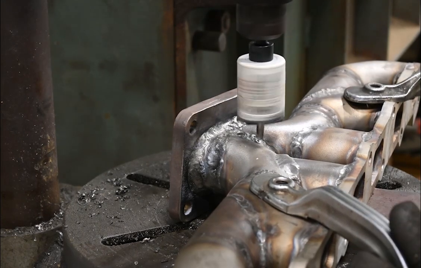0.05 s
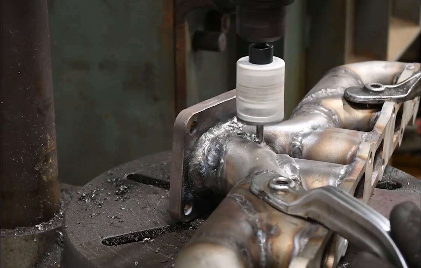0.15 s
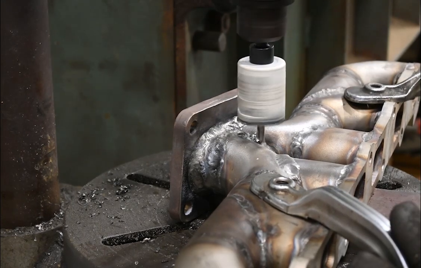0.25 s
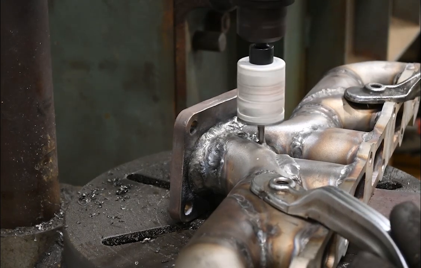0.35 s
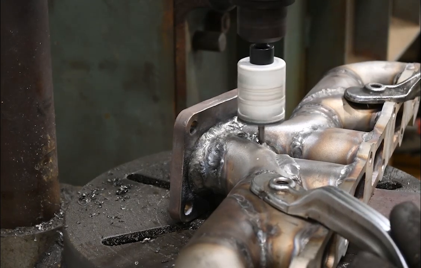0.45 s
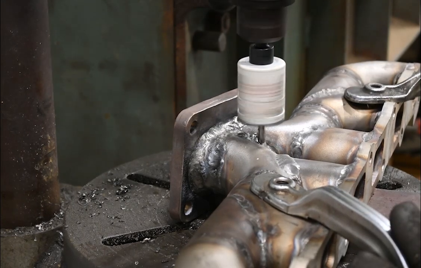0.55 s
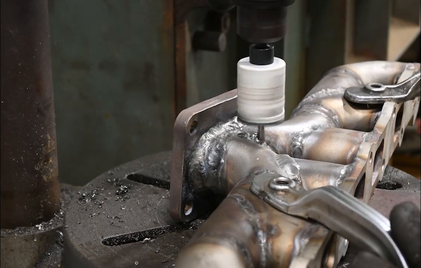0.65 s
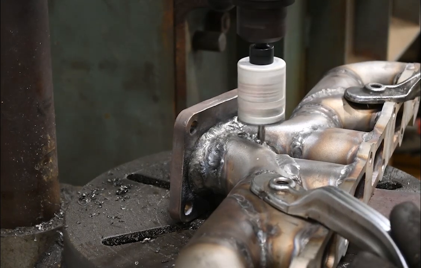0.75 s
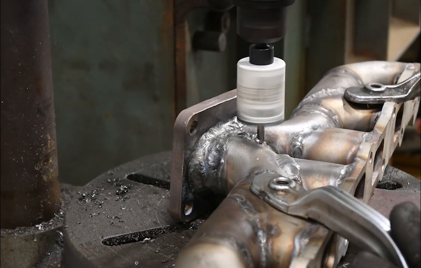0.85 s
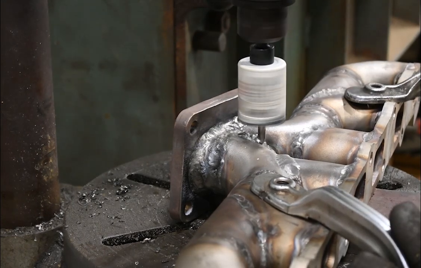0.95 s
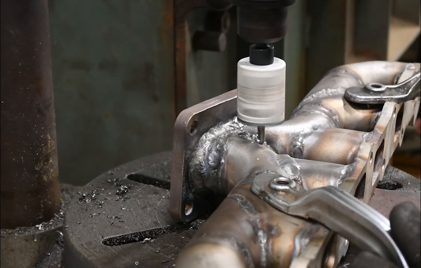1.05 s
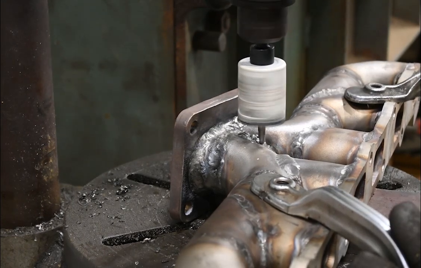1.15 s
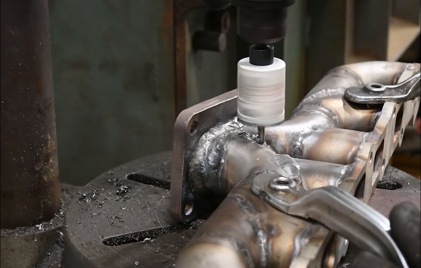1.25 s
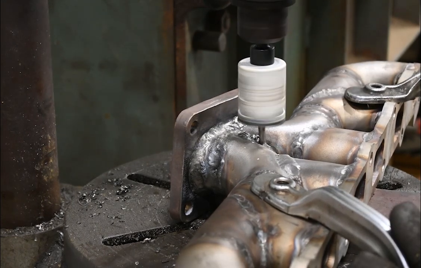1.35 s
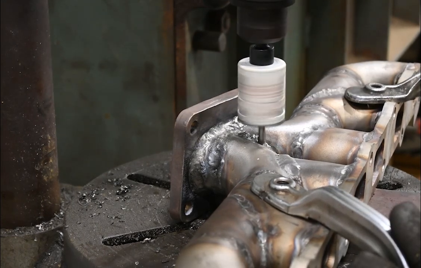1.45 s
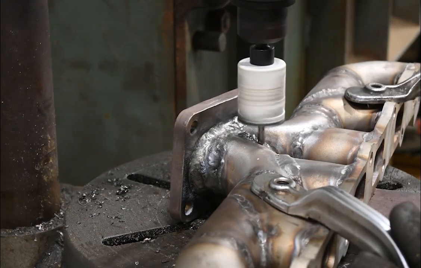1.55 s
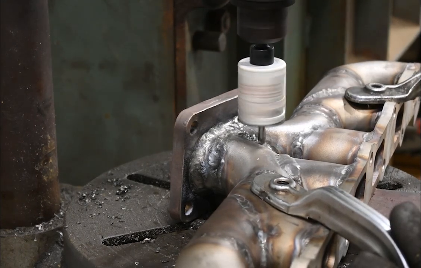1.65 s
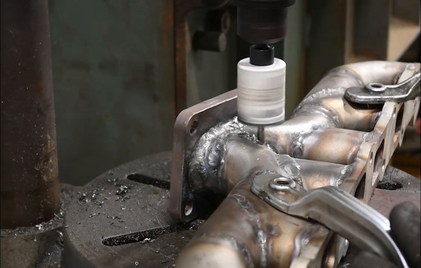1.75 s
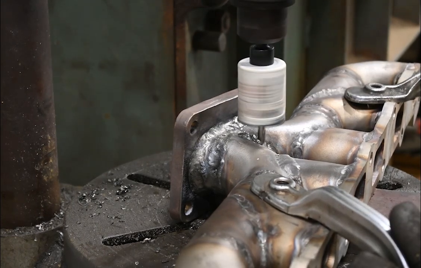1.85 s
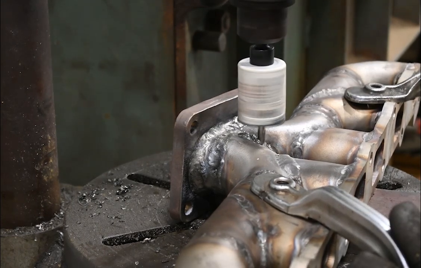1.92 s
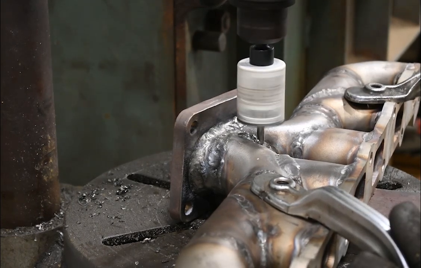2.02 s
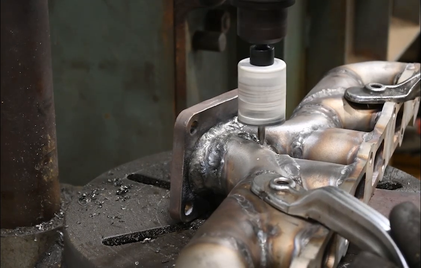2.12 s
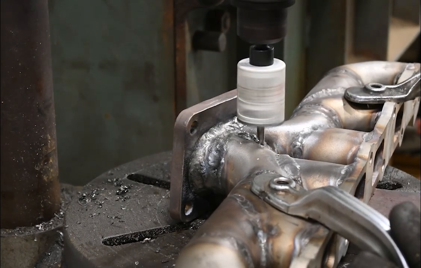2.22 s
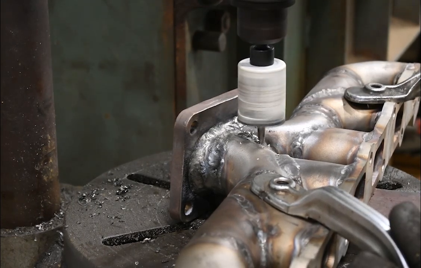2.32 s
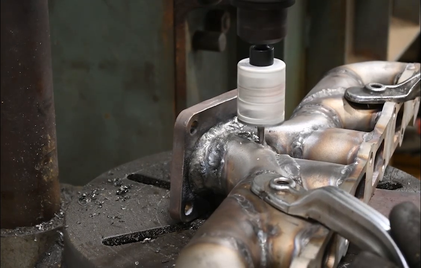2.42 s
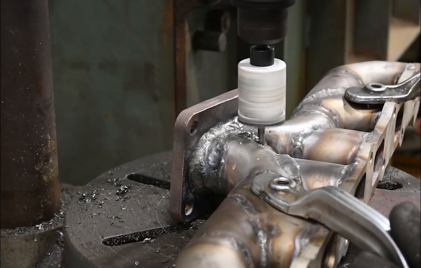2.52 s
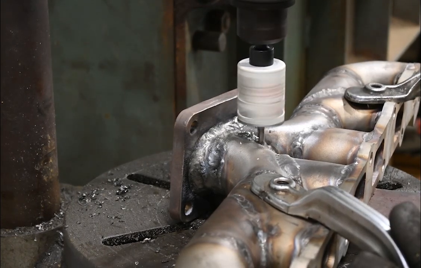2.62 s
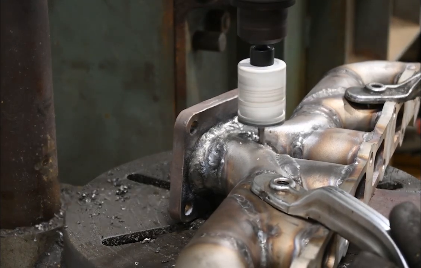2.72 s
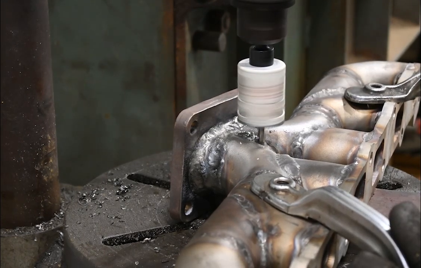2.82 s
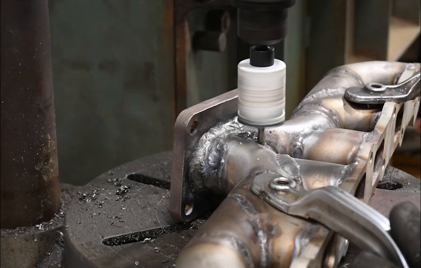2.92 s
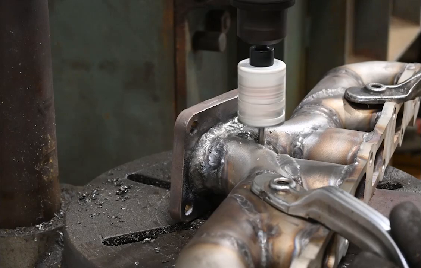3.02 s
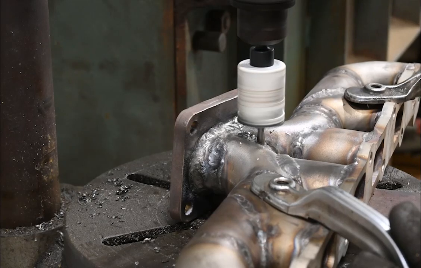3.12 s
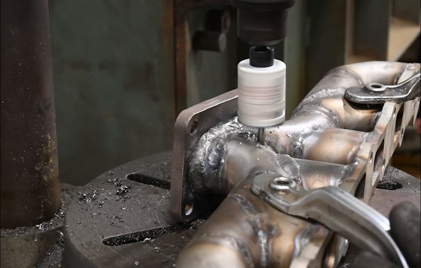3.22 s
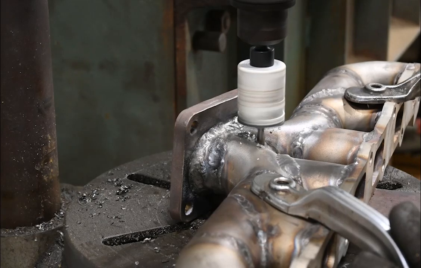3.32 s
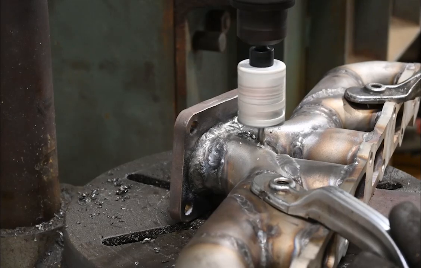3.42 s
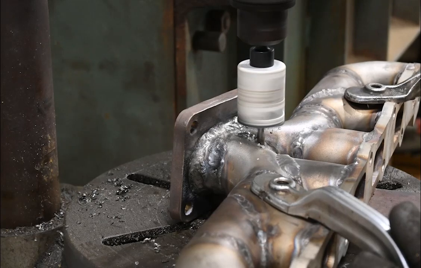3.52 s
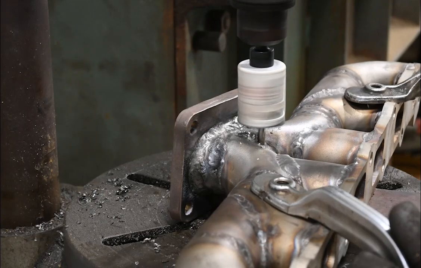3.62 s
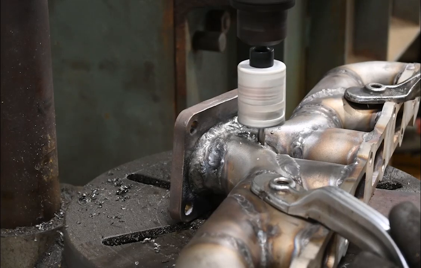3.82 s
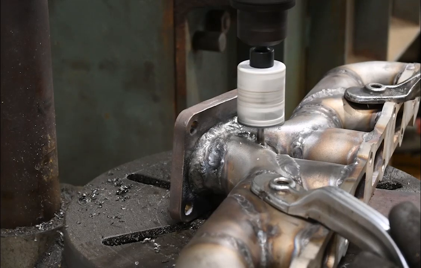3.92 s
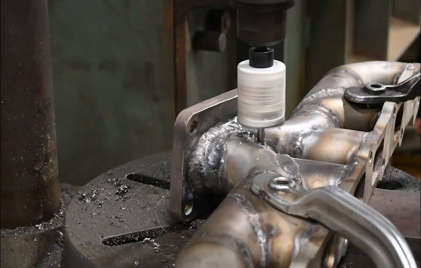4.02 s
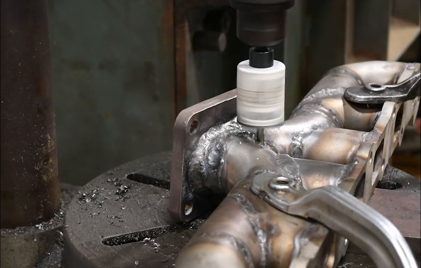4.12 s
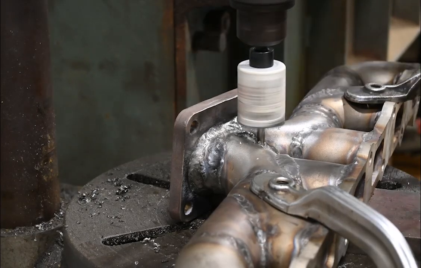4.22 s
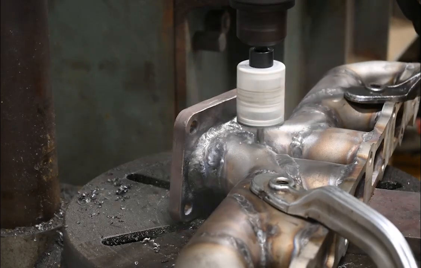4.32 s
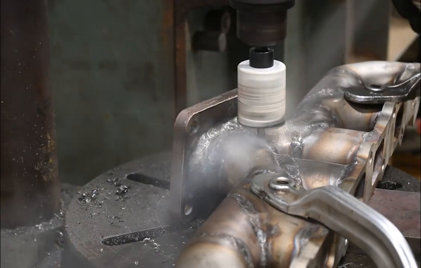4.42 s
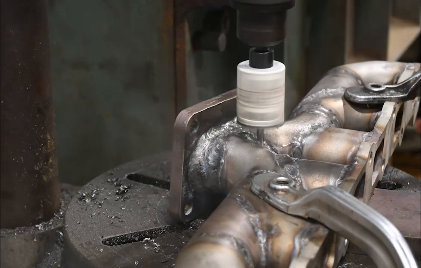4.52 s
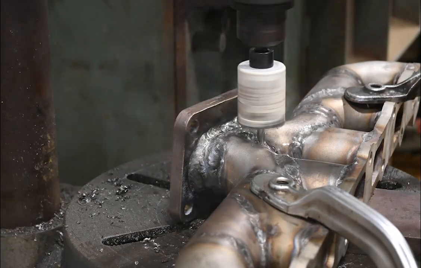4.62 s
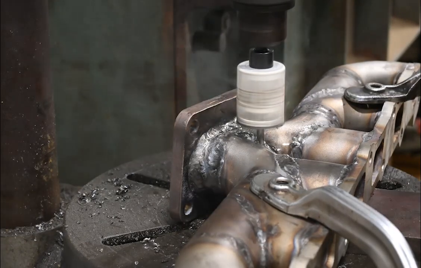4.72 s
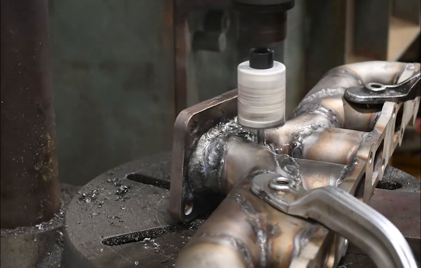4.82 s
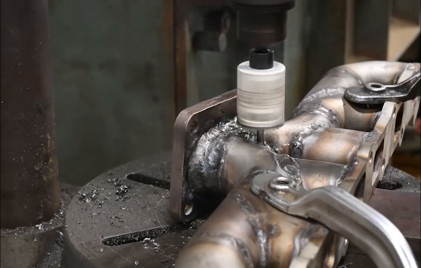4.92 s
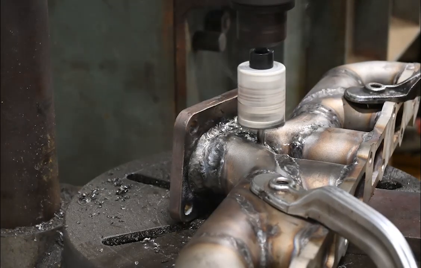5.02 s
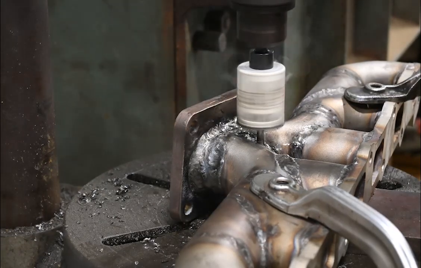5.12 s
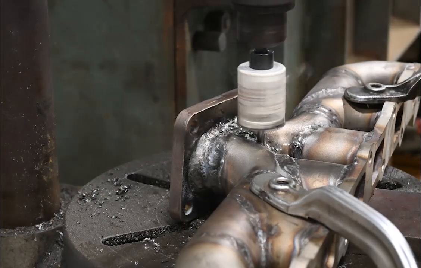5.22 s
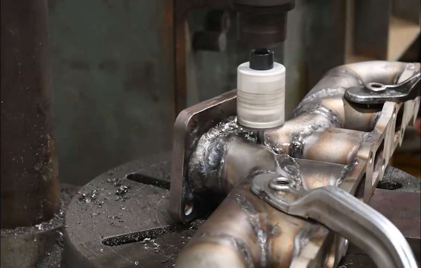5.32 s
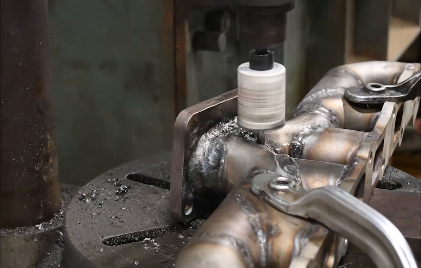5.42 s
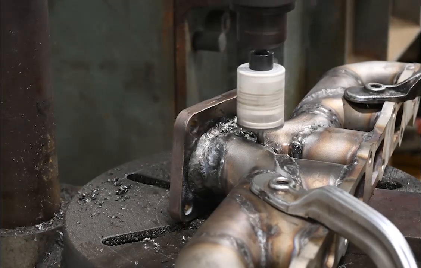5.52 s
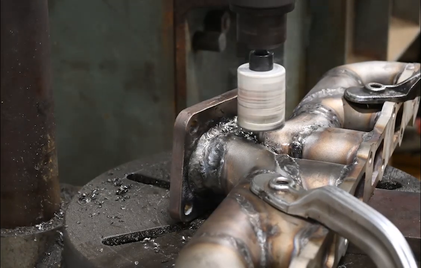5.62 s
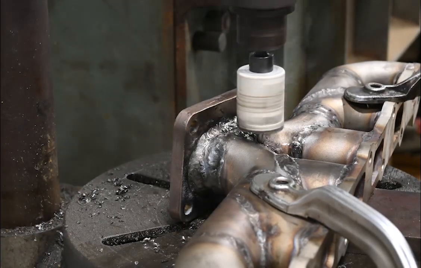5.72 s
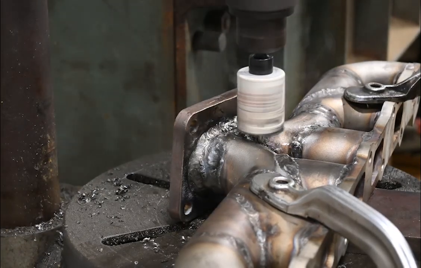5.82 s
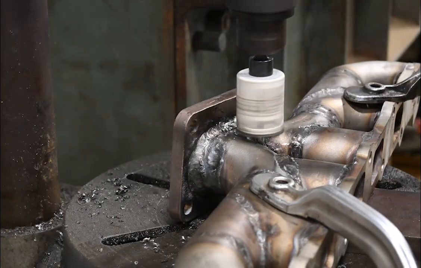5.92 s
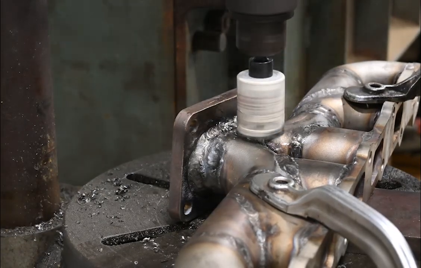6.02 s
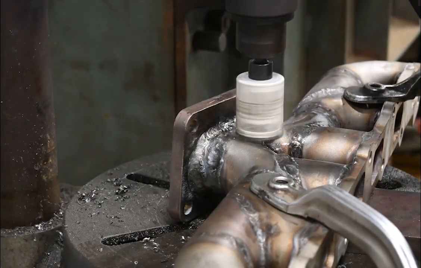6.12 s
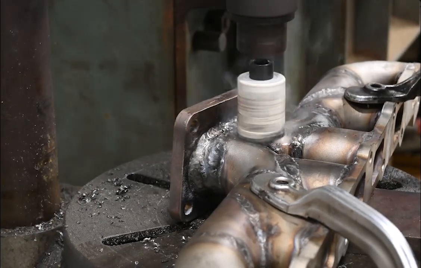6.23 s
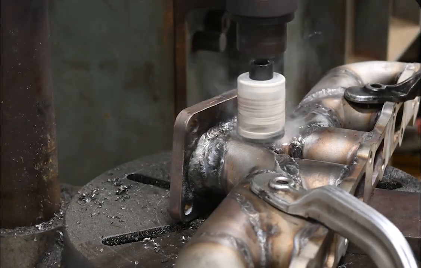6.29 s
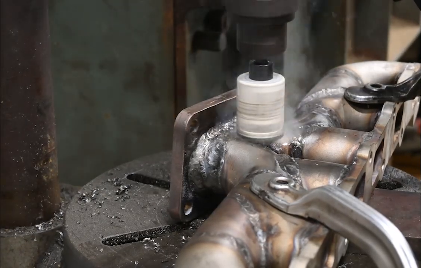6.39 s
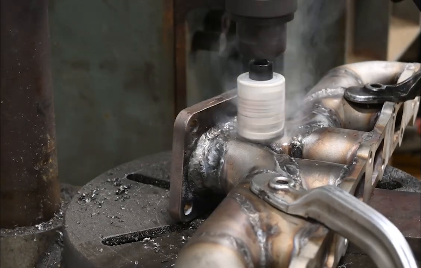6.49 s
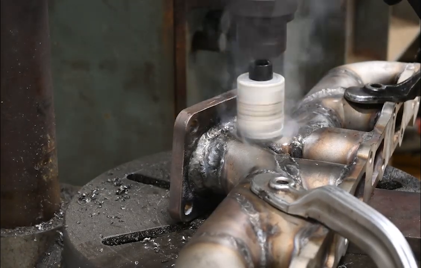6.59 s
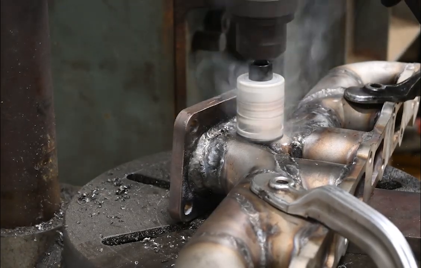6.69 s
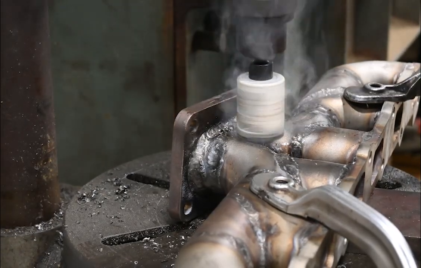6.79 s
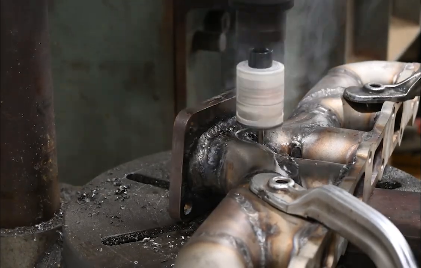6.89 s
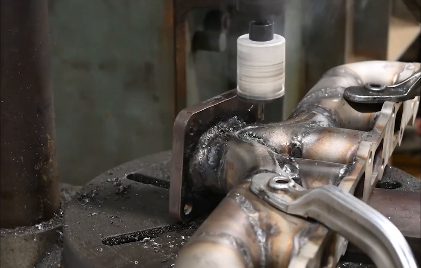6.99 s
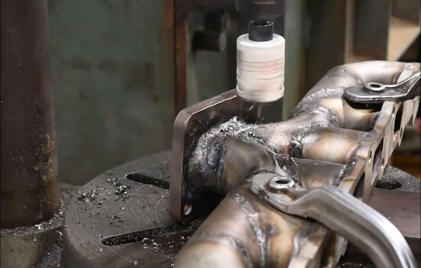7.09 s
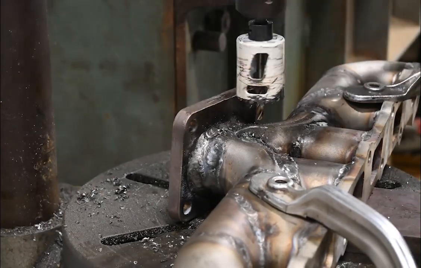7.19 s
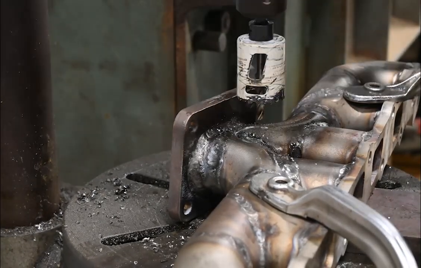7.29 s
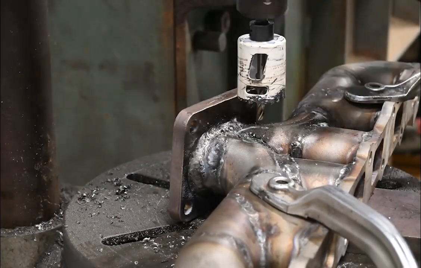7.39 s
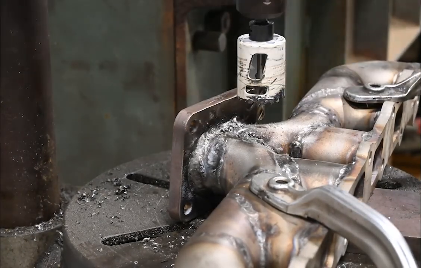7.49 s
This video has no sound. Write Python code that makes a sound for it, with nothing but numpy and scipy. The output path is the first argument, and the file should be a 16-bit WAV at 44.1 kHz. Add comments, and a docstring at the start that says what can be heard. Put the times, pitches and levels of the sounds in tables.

```python
"""In a workshop, a belt-driven drill press runs a hole saw into a steel tube, close to one microphone.
The drive whines (sine tones) and rattles (noise through steel resonances); the saw scrapes the tube
once a turn (pulsed noise), then digs in and shrieks for half a second (torn noise, chatter, squeals).
The saw is lifted, the motor is switched off and the machine stops with a few clicks and rings."""
import sys
import numpy as np
from scipy import signal
from scipy.fft import rfft, irfft, next_fast_len
from scipy.io import wavfile
from scipy.ndimage import uniform_filter1d, map_coordinates

SR = 44100
rng = np.random.default_rng(int(sys.argv[2]) if len(sys.argv) > 2 else 0)


def store_pcm(level_fs):
    """Save levels as 16-bit WAV."""
    pcm = np.round(np.clip(level_fs, -1, 1) * 32767).astype(np.int16)
    wavfile.write(sys.argv[1], SR, np.atleast_2d(pcm).T)


N = 332955
T = np.arange(N) / SR  # s
EDGE_HZ = 15800  # upper band limit
# the saw leaves the tube, the motor is switched off, the spindle stands still
LIFT_S, OFF_S, STILL_S = 6.85, 7.07, 7.42
# the motor's power goes quickly; friction then brakes ever harder; gain falls with a power of the speed
LET_GO_S, BRAKING_POWER, NOISE_POWER = 0.052, 3.0, 2.9
UNPOWERED_DB = -18  # drop of rattle and drive tones without power
GRIP_S, LOOSEN_S = 0.0066, 0.013  # the rim grips, and breaks free
BUILD_DB = 4.5  # growth of pressure during one dig


def amp(db):
    """Logarithmic level: decibels to amplitude gain."""
    return 10 ** (np.asarray(db) / 20)


def unit(x):
    """Normalisation by effective value: scales to rms 1."""
    return x / np.sqrt(np.mean(x ** 2) + 1e-20)


def curve(rows):
    """Linear interpolation: the second column of a time table at every sample."""
    rows = np.array(rows, float)
    return np.interp(T, rows[:, 0], rows[:, 1])


def drift(hz):
    """Low-pass random process: smooth chance of rms 1 that moves about hz times a second."""
    size = next_fast_len(N)
    f = np.fft.rfftfreq(size, 1 / SR)
    spectrum = rfft(rng.standard_normal(size)) * np.exp(-(f / hz) ** 2)
    return unit(irfft(spectrum, size)[:N])


def add(mix, s, sound):
    """Superposition: mixes a sound in at time s."""
    part = mix[max(round(s * SR), 0):][:len(sound)]
    part += sound[:len(part)]


def ring(x, colour, modes=(), size=8192):
    """Modal resonance: minimum-phase filter of energy 1, a broad colour lifted or cut at each mode."""
    f = np.fft.rfftfreq(size, 1 / SR)
    hz, colour_db = np.transpose(colour)
    db = np.interp(np.log(f + 1), np.log(hz), colour_db)
    for centre, width, lift in modes:
        db = db + lift * np.exp(-2 * ((f - centre) / width) ** 2)
    gain = amp(db) / np.sqrt(np.mean(amp(db) ** 2 * (f < EDGE_HZ)))
    # the Hilbert transform of the log gain gives the phase of a causal response
    log_gain = np.log(np.r_[gain, gain[-2:0:-1]])
    response = np.fft.ifft(np.exp(np.conj(signal.hilbert(log_gain)))).real
    return signal.oaconvolve(x, response[:size // 2])[:N]


def ramp(start, length):
    """Linear transition: rises from 0 to 1 over length seconds."""
    return np.clip((T - start) / length, 0, 1)


def speed():
    """Frictional braking: drive speed as a share of full speed."""
    return 1 - ramp(OFF_S, STILL_S - OFF_S) ** BRAKING_POWER


def running(drop_db):
    """Loss of excitation: gain drops as the power goes, then falls with a power of the speed."""
    return amp(drop_db * ramp(OFF_S, LET_GO_S)) * speed() ** NOISE_POWER


# Spindle rate under power. Each row: time in seconds, turns a second before braking.
SPINDLE = [(0, 45.6), (.7, 45.55), (1.7, 45.3), (2.7, 45.08), (3.7, 45.35), (4.7, 44.95), (5.3, 44.7),
           (6.2, 44.4)]


def turns():
    """Integrated rotation: turns of the saw; its high spot meets the tube at each whole number."""
    return np.cumsum(curve(SPINDLE) * speed()) / SR - 1 / 4


def grip(start, length):
    """Build-up and release: hold of the rim on the tube, 0-1, growing until the chip breaks free."""
    pressure = amp(BUILD_DB * (ramp(start, length) - 1))
    release = np.exp(-np.clip((T - start - length) / LOOSEN_S, 0, 20))
    return ramp(start, GRIP_S) * pressure * release


# Colour of the still workshop. Each row: frequency in Hz, relative level in dB.
ROOM_COLOUR = [(24, -37), (40, -1), (61, -34.5), (313, -32), (502, 0), (2990, 1), (4340, 3), (15000, -7.5)]


def room(room_db=-76):
    """Stationary background noise: faint, steady and coloured."""
    return amp(room_db) * ring(rng.standard_normal(N), ROOM_COLOUR)


WHINE_HZ = 720.1  # basic pitch of the motor
# Magnetic whine. Each row: multiple of the basic pitch, rms level in dB before the whine trim.
WHINE = [(1, -61.5), (2, -59.5), (3, -53.5), (4, -64.5)]
# Belt, pulleys and bearings. Each row: full-speed frequency in Hz, rms level in dB before the tone trim.
DRIVE_TONES = [(310, -72.5), (353, -76.5), (404, -79), (450, -79.5), (532, -74), (544, -67.5),
               (1618, -67.5), (1794, -79.5), (1821, -62), (1972, -57.5), (1984, -55), (2264, -65.5),
               (2402, -61.5), (2505, -57), (2514, -50), (2704, -70), (2743, -53.5), (3087, -55),
               (3424, -53.5), (3463, -56.5), (3955, -51), (4183, -60), (4321, -63.5), (4636, -61),
               (4675, -47.5), (5352, -50.5), (5395, -55.5), (6259, -50.5)]


def motor(whine_db=1.3, tones_db=-3, waver_hz=3.265, waver_db=2, whine_off_db=-27):
    """Harmonic and rotational tones: a steady-pitched magnetic whine; wavering tones sag as parts stop."""
    whine, tones = np.zeros(N), np.zeros(N)
    for k, db in WHINE:
        phase = 2 * np.pi * (k * WHINE_HZ * T + rng.random())
        whine += amp(db + 0.2 * k * drift(40)) * np.sin(phase)
    share = speed()
    for hz, db in DRIVE_TONES:
        pitch = hz * share + waver_hz * hz / 2000 * drift(12.53)  # waver_hz applies at 2000 Hz
        phase = 2 * np.pi * (np.cumsum(pitch) / SR + rng.random())
        tones += amp(db + waver_db * drift(12)) * np.sin(phase)
    whine *= amp(whine_db) * running(whine_off_db)
    tones *= amp(tones_db) * running(UNPOWERED_DB)
    return np.sqrt(2) * (whine + tones)  # sine peaks for rms levels


# Resonances of press, table and tube, shared by the sources below.
# Each row: frequency in Hz, width in Hz, lift in dB.
STEEL = [(451, 32, 8), (529.7, 33.5, 16), (1077, 270, 9), (1540, 230, 9), (1838, 207, 17.5), (1983, 42, 6),
         (2236, 270, 13), (2492, 105, 14.5), (2748, 206, 8), (3074, 212, 8), (3402, 400, 7),
         (4094, 533, 9.5), (4690, 226, 8), (5230, 220, 5.5), (5565, 54, 8), (6140, 425, 4.5),
         (6497, 110, 7.5), (7510, 220, 7.5), (7923, 89, 9.5), (8580, 190, 8.5), (9280, 140, 11.5),
         (9930, 300, 10), (10680, 160, 7.5), (11380, 90, 10.5), (12190, 340, 6), (12900, 140, 11),
         (12800, 130, -3.5), (14290, 230, 4), (15500, 60, 0)]
# Gaps between resonances, where the frame mostly radiates little.
# Each row: frequency in Hz, width in Hz, lift in dB (negative is a cut).
GAPS = [(383, 44, -7), (553, 17, -18.5), (798, 32, -23.5), (1471, 16, 8), (4850, 170, 3.5)]
# Colour of the running drive. Each row: frequency in Hz, relative level in dB.
RATTLE_COLOUR = [(60, -40), (200, -43.5), (280, -35.5), (400, -23), (800, -23), (1300, -20.5),
                 (1750, -19.5), (2600, -13), (4000, -3.5), (7000, 1), (9000, -6), (12000, -5.5),
                 (15700, -3.5)]


def rattle(rattle_db=-33.5, loaded_db=4, belt_hz=34.44, repeating=0.26, buzz=0.2,
           flutter_db=0.99, rough_db=0.65, size=1280):
    """Forced vibration: bearings and belt shake the steel, partly repeating with every belt lap."""
    laps = np.cumsum(belt_hz * speed() * (1 + 0.001494 * drift(3.064))) / SR
    belt = map_coordinates(rng.standard_normal(size), [laps % 1 * size], order=3, mode="grid-wrap")
    # repeating is the belt's share of the power
    shake = np.sqrt(repeating) * belt + np.sqrt(1 - repeating) * rng.standard_normal(N)
    shake *= 1 + buzz * np.sin(2 * np.pi * WHINE_HZ * T)  # the motor's torque ripple beats the loose parts
    shake *= amp(flutter_db * drift(27) + rough_db * drift(500))
    load = np.max([grip(s, length) for s, length, *_ in DIGS], axis=0)  # louder under a heavy cut
    level = amp(rattle_db + loaded_db * load) * running(UNPOWERED_DB)
    return ring(unit(shake) * level, RATTLE_COLOUR, [*STEEL, *GAPS])


# Colour of the free spindle. Each row: frequency in Hz, relative level in dB.
COAST_COLOUR = [(200, -46), (520, -13), (1050, -17.5), (1500, -12.5), (1900, -16.5), (3600, 0.5),
                (5000, -13), (6000, 4), (11000, -6.5), (13000, 3), (15700, 3)]
# Small parts ringing. Each row: start in seconds, frequency in Hz, level in dB, 60 dB decay in seconds.
PINGS = [(7.305, 6480, -53, 0.11), (7.317, 7330, -48, 0.087), (7.32, 2760, -64, 0.15),
         (7.335, 810, -66, 0.057)]


def coast(tick_db=2.5, whirr_db=-39.5, fade_db_per_s=68):
    """Free running and free decay: the spindle ticks in its bearings; small parts ring as it halts."""
    ticking = unit(rng.standard_normal(N) * amp(tick_db * drift(250)))
    fade = amp(whirr_db - fade_db_per_s * np.maximum(T - OFF_S, 0))
    level = ramp(LIFT_S, LOOSEN_S) * fade * speed() ** NOISE_POWER
    sound = ring(ticking * level, COAST_COLOUR, STEEL)
    t = T[:SR // 4]
    for s, hz, db, t60 in PINGS:
        add(sound, s, amp(db - 60 * t / t60) * np.sin(2 * np.pi * hz * t))
    return sound


# Colour of a knock on the frame. Each row: frequency in Hz, relative level in dB.
KNOCK_COLOUR = [(100, -35), (500, -19), (1000, -18.5), (2000, -14), (4000, -2), (7000, 7), (10000, -2.5),
                (15000, 4.5)]
# Chips snagging and loose parts knocking.
# Each row: start in seconds, level in dB before the knock trim, length in seconds (peak at a third of it).
KNOCKS = [(0.046, -29.5, 0.018), (0.067, -27.5, 0.024), (.156, -27, 0.012), (0.195, -28, 0.038),
          (6.98, -31, 0.0088), (7.016, -26, 0.012), (7.26, -53, 0.0087), (7.287, -46, 0.0072),
          (7.329, -57, 0.015), (7.458, -73, .01), (7.493, -57.5, 0.0072), (7.505, -65, .005),
          (7.537, -51, 0.011)]


def knocks(knock_db=4):
    """Impact excitation: short gritty bursts ring the same steel."""
    blows = np.zeros(N)
    for s, db, length in KNOCKS:
        u = T[:SR // 10] / (length / 3)
        envelope = 2 * u * np.exp(-u)
        add(blows, s, amp(db + knock_db) * envelope * rng.standard_normal(len(u)))
    return ring(blows, KNOCK_COLOUR, STEEL)


# Colour of light tooth contact. Each row: frequency in Hz, relative level in dB.
SCRAPE_COLOUR = [(60, -63), (1000, -55), (3000, -24), (5500, -1), (8000, -4), (11400, -14.5), (12100, 5),
                 (12600, -9), (13400, 6), (13900, 16), (14800, -18), (15700, 5.5)]
# Light contact, following the hand on the feed lever.
# Each row: time in seconds, level in dB before the scrape trim.
SCRAPE = [(0, -38), (.55, -42.5), (1.4, -37.5), (1.7, -34.5), (2.2, -31.5), (2.7, -34.5), (3.1, -38),
          (3.7, -38), (4.25, -34.5), (4.5, -38.5), (5.2, -42.5), (5.45, -62)]
# Extent of tooth contact in each turn. Each row: time in seconds, nominal share of the turn, 0-1.
CONTACT = [(.5, .4), (1.45, .2), (2.2, 0.36), (3.05, 0.2), (3.65, 0.7), (4.05, .33), (5.2, 0)]
# A tooth catching hard in passing. Each row: middle in seconds, level in dB before the catch trim.
CATCHES = [(1.699, -31), (1.874, -30), (1.941, -27), (1.964, -31), (2.492, -34), (2.737, -29), (3.003, -27),
           (3.203, -35), (3.845, -26), (4.175, -30), (4.263, -27), (4.55, -29), (4.818, -24), (5.602, -30),
           (5.735, -26.5)]
RISE, RELEASE = .4, .72  # a stroke builds faster than it lets go: widths as shares of the contact
CUP_HZ, CUP_WIDTH_HZ = 14220, 230  # resonance of the saw cup
# ring of the cup before its filter, relative to the scraping: at full contact, and gain per unit of contact
CUP_RING_DB, CUP_GROWTH_DB = -2.5, 9


def scrape(grit_db=2.5, uneven_db=1.7, rubbing=0.14, catch_length=0.0019, scrape_db=-0.5, catch_db=1):
    """Periodic friction: the highest teeth brush the tube once a turn, briefly or longer, and may catch."""
    angle = (turns() + .5) % 1 - .5  # in turns from the high spot
    touch = np.clip(curve(CONTACT), .05, 1)
    width = touch * np.where(angle < 0, RISE, RELEASE)
    stroke = np.exp(-2 * (angle / width) ** 2)
    force = unit((rubbing + stroke) / np.sqrt(touch) * amp(uneven_db * drift(40)))
    force = force * amp(curve(SCRAPE) + scrape_db) * (T < LIFT_S)
    t = np.arange(-SR // 100, SR // 100) / SR
    for s, db in CATCHES:
        add(force, s + t[0], amp(db + catch_db) * np.exp(-(t / catch_length) ** 2))
    chips = force * unit(rng.standard_normal(N) * amp(grit_db * drift(900)))
    # the thin cup sings at one high resonance, more freely the longer the teeth stay on
    drive = chips * amp(CUP_RING_DB + CUP_GROWTH_DB * (touch - 1))
    cup = ring(drive, [(100, -53.5), (12000, -3)], [(CUP_HZ, CUP_WIDTH_HZ, 28)])
    return ring(chips, SCRAPE_COLOUR, STEEL) + cup


# Colour of the heavy cut. Each row: frequency in Hz, relative level in dB.
CUT_COLOUR = [(60, -29), (400, -34.5), (900, -23.5), (1700, -21.5), (4000, -8.5), (5500, -1), (7000, 1.5),
              (8200, 2.5), (10500, -3.5), (13000, 2), (14200, 2.5), (15000, 6), (15700, -22)]
# The rim digs in, here and in bites() and rattle(). Each row: start in seconds, length in seconds,
# tearing at its deepest in dB, central chatter in Hz, mean bite in dB before trims, mean squeal in Hz.
DIGS = [(6.182, .14, -31, 6500, -26, 6420), (6.203, 0.027, -13, 6600, -16.5, 6770),
        (6.336, 0.083, -7.5, 7100, -14, 7180), (6.444, 0.12, -11.5, 7550, -10, 7470),
        (6.58, 0.0063, -28, 7300, -7, 7100), (6.602, .048, -12.5, 7600, -8.5, 7580),
        (6.646, 0.15, -5.5, 8060, -11.5, 9080), (6.807, .028, -14.5, 7900, -7.5, 8230)]
CHATTER_WIDTH_HZ, CHATTER_SWING = 1300, .05  # swing as a share of the chatter pitch


def cut(tear_db=2.0, grit_db=2.0, jerk_db=1.5, throb_db=2, deepest=0.88, chatter_db=-10.0):
    """Chip fracture and chatter: the rim tears chips in uneven jerks, hardest at one point of each turn."""
    throb = np.cos(2 * np.pi * (turns() - deepest))
    uneven_db = jerk_db * drift(60) + tear_db * drift(260) + grit_db * drift(1200)
    chips = unit(rng.standard_normal(N) * amp(throb_db * throb + uneven_db))
    holds = np.array([amp(db) * grip(s, length) for s, length, db, *_ in DIGS])
    feed = holds.max(axis=0)
    # the strongest dig sets the pitch
    chatter_hz = np.array([hz for _, _, _, hz, _, _ in DIGS])[holds.argmax(axis=0)]
    pitch = chatter_hz * (1 + CHATTER_SWING * throb)  # the grip tightens and slackens each turn
    # shift the noise down, low-pass it and shift it back: a narrow band that follows the pitch
    spin = np.exp(2j * np.pi * np.cumsum(pitch) / SR)
    lowpass = signal.butter(2, CHATTER_WIDTH_HZ / 2, fs=SR, output="sos")
    band = signal.sosfilt(lowpass, chips / spin)
    chatter = unit((spin * band).real * amp(2 * throb_db * throb))
    return ring(chips * feed, CUT_COLOUR, STEEL) + amp(chatter_db) * chatter * feed


FIRST_BITE_S = .004  # after the start of the dig; the others follow a turn apart


def bites(length=0.00416, squeal_db=1, octave_db=2, crunch_db=-3, arch=0.0723, jitter=0.027,
          uneven_db=3.0, scatter=.025):
    """Stick-slip: once a turn in a dig, a short arching squeal with its octave, in a crunch of chips."""
    t = np.arange(-SR // 80, SR // 80) / SR
    force = np.exp(-(t / length) ** 2)
    squeals, crunch = np.zeros(N), np.zeros(N)
    for start, held, _, _, bite_db, hz in DIGS:
        for s in start + FIRST_BITE_S + np.arange(0, held, 1 / SPINDLE[-1][1]):
            slip, chips = rng.standard_normal((2, len(t)))
            db = bite_db + uneven_db * rng.standard_normal()
            wander = jitter * unit(uniform_filter1d(slip, size=30))
            pitch = hz * (1 + scatter * rng.standard_normal() + arch * (force - .8) + wander)
            phase = 2 * np.pi * np.cumsum(pitch) / SR
            tone = np.sin(phase) + amp(octave_db) * np.sin(2 * phase)
            add(squeals, s + t[0], amp(db + squeal_db) * force * tone)
            add(crunch, s + t[0], amp(db + crunch_db) * force * chips)
    return ring(squeals, [(100, 0), (16000, 0)], STEEL) + ring(crunch, CUT_COLOUR, STEEL)


def scene():
    """Superposition of sources: everything reaches one microphone, alike in both channels."""
    sound = room() + motor() + rattle() + coast() + knocks() + scrape() + cut() + bites()
    return np.array([sound, sound])


def record(dry, threshold_db=-21, squeeze=0.76, recovery_db=400, knee=0.13, lopsided=0.035):
    """Compression and asymmetric distortion: a quick limiter, slightly bent crests, then the band limit."""
    power_db = 10 * np.log10(abs(uniform_filter1d(dry[0] ** 2, size=130)) + 1e-12)
    fall = T * recovery_db  # the held peak recovers at recovery_db a second
    peak_db = np.maximum.accumulate(power_db + fall) - fall
    over_db = np.maximum(peak_db - threshold_db, 0)
    held = dry * amp(-squeeze * uniform_filter1d(over_db, size=60))
    # only positive crests above the knee are bent, which adds a little rumble
    bent = held - lopsided * np.maximum(held - knee, 0)
    bent = signal.sosfilt(signal.butter(1, 25, "high", fs=SR, output="sos"), bent)
    lowpass = signal.firwin(701, EDGE_HZ, window=("kaiser", 8), fs=SR)
    return signal.oaconvolve(bent, lowpass[None], "same", axes=1)


dry = scene()
out = record(dry)
store_pcm(out)
```